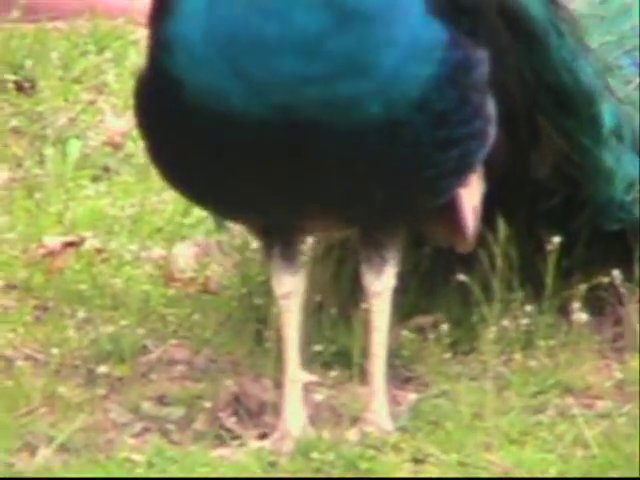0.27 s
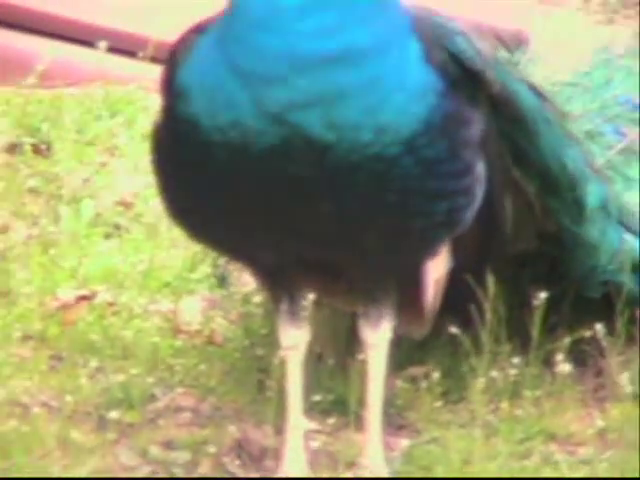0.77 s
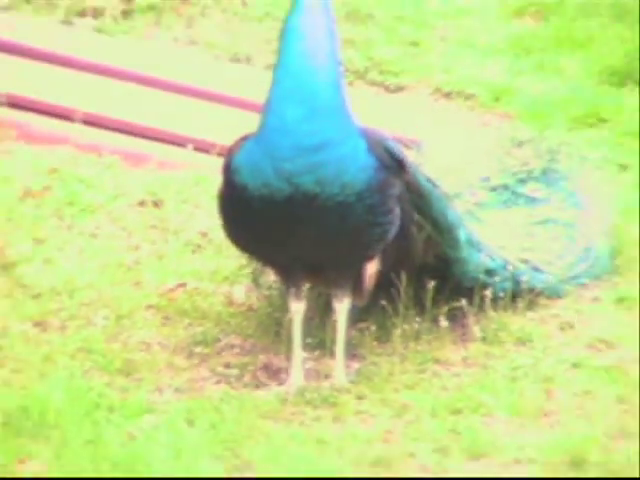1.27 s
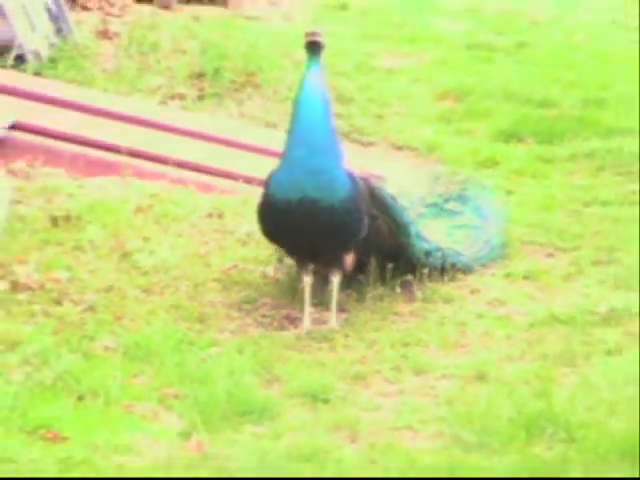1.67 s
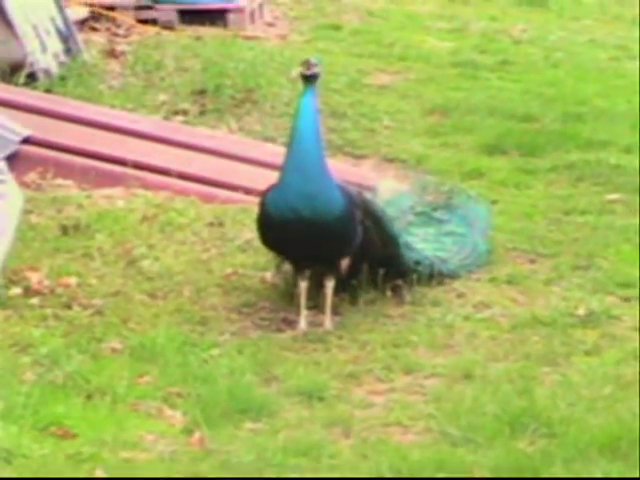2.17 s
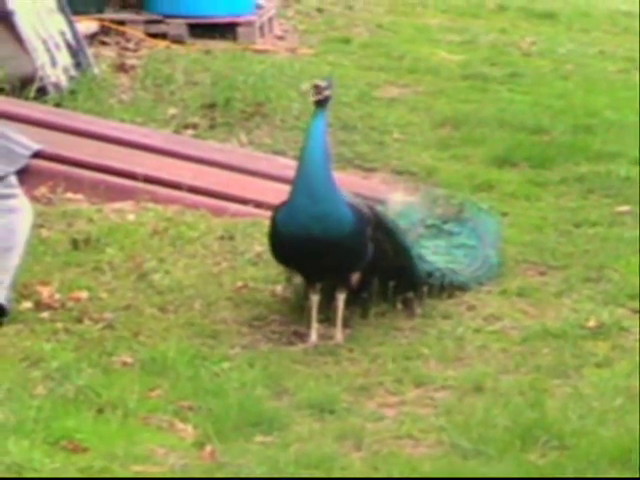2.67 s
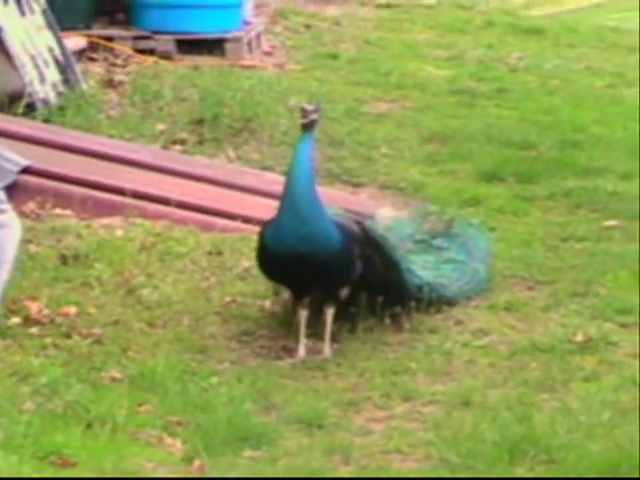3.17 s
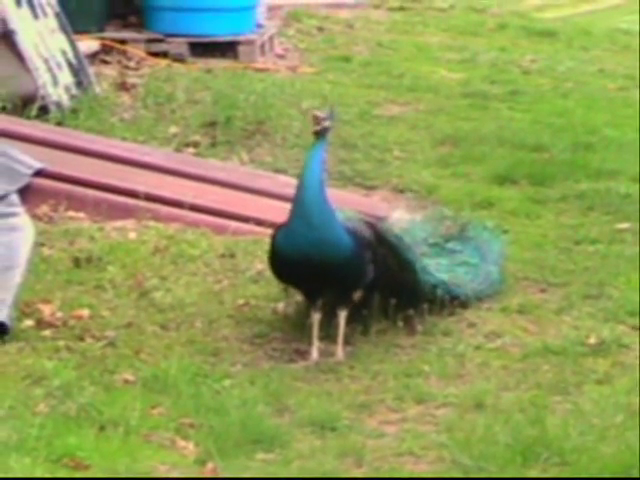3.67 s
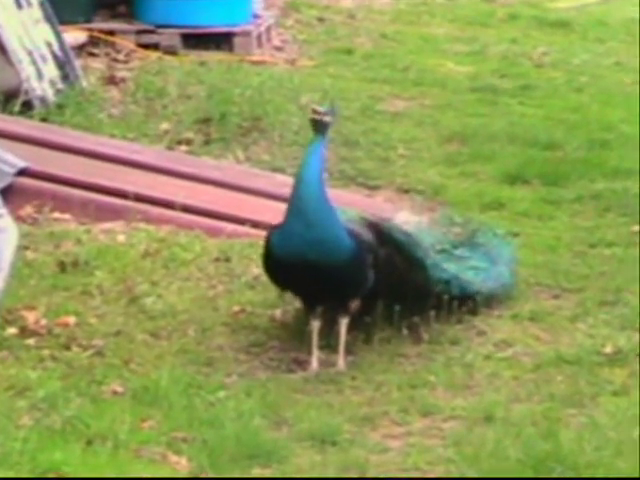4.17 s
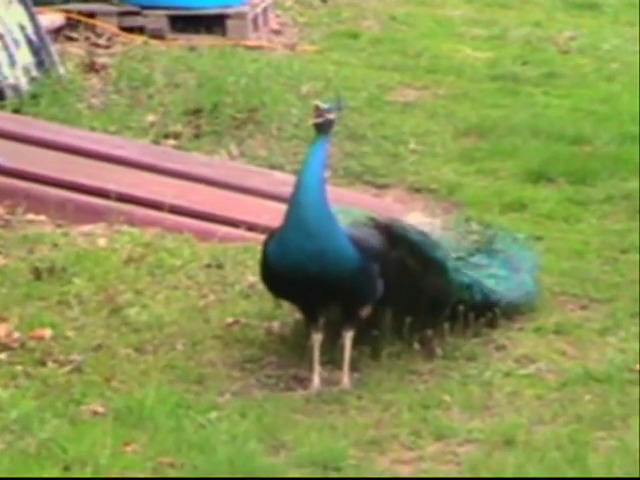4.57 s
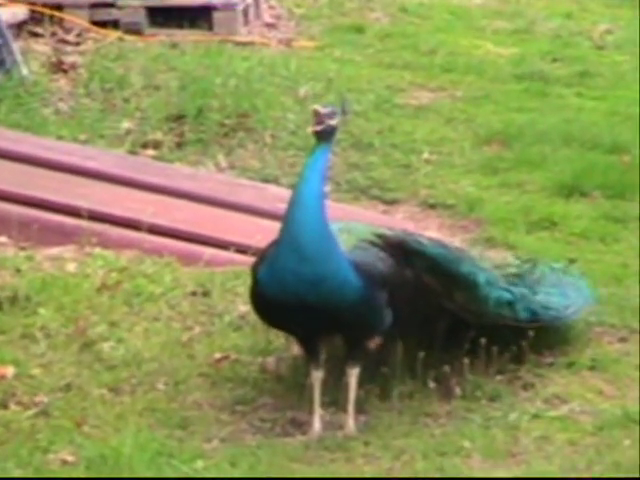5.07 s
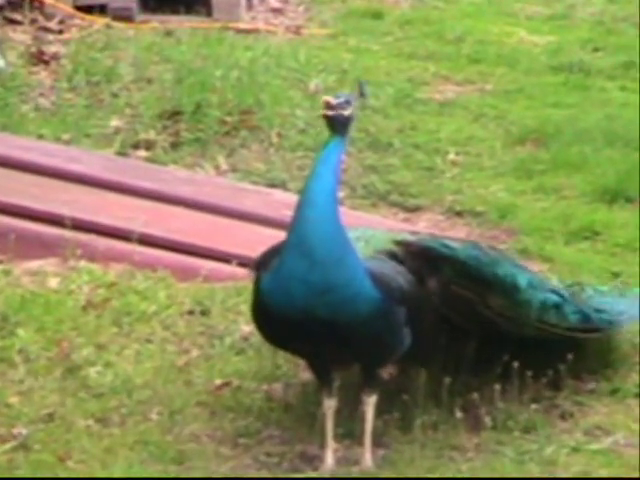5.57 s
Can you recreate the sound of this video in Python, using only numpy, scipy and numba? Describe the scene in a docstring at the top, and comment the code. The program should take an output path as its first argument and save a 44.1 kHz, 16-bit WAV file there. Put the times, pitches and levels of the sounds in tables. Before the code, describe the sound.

A peacock on a lawn gives one long throbbing, sagging wail, then six loud arched honks, echoing faintly over low outdoor air.

```python
"""A peacock on a lawn, a few metres from a camcorder: one long throbbing call, six arched honks and short clucks.
Each call stacks partials on a gliding pitch; the clucks are puffs of noise that ring the throat.
The ground colours the honks and the garden echoes every bird, over a low hum of air and a faint songbird.
The camcorder's gain control ducks the background under each call. It also holds each sample at a low rate,
which mirrors the calls into the treble as a thin fizz."""
import sys
import numpy as np
from scipy import signal
from scipy.fft import rfft, irfft, next_fast_len
from scipy.io import wavfile
from scipy.ndimage import uniform_filter1d, map_coordinates
from numba import njit

SR = 44100
rng = np.random.default_rng(int(sys.argv[2]) if len(sys.argv) > 2 else 0)


def materialize(psi):
    """Save the field psi as 16-bit PCM at rate SR to the path in sys.argv[1].

    A 1-D psi becomes a single channel; in a 2-D psi each row is a channel.
    """
    bounded = np.clip(np.atleast_2d(psi).T, -1, 1)
    quanta = np.round(bounded * 32767).astype(np.int16)
    wavfile.write(sys.argv[1], SR, quanta)


N = 255766
T = np.arange(N) / SR  # time of every sample, s


def undb(db):
    """Decibels to gain."""
    return 10 ** (np.asarray(db) / 20)


def unit(x):
    """Scale to rms 1."""
    return x / np.sqrt(np.mean(x ** 2) + 1e-20)


def columns(rows, at):
    """Read every later column of a table where the first column equals `at`, joined by straight lines."""
    first, *others = np.transpose(rows)
    return [np.interp(at, first, values) for values in others]


def spectrum_db(points, hz):
    """Read (frequency_hz, level_db) points on a log-frequency axis."""
    point_hz, point_db = np.transpose(points)
    return np.interp(np.log(np.maximum(hz, 1)), np.log(point_hz), point_db)


def noise(points, size):
    """Noise of rms 1, coloured by (frequency_hz, level_db) points."""
    n = next_fast_len(size, True)
    white = rfft(rng.standard_normal(n))
    gain = undb(spectrum_db(points, np.fft.rfftfreq(n, 1 / SR)))
    return unit(irfft(white * gain, n)[:size])


def walk(rate, size):
    """Smooth chance with a spread near 1, drawing `rate` new values a second."""
    place = np.arange(size) * rate / SR
    return map_coordinates(rng.standard_normal(size // 8), [place], order=2, mode="wrap")


def gate(t, start, end, fade):
    """1 between start and end, with straight fades."""
    return np.clip(np.minimum(t - start, end - t) / fade, 0, 1)


AIR_LEVEL_DB, AIR_DB_PER_S = -44.8, -.7  # the breeze slowly eases
GUST_DB, GUST_S = 6, .07  # a gust is dying down at the start
HUM_HZ, HUM_DB = 126, -55  # middle pitch and level of the hum
# colour of the open air: frequency_hz, level_db
AIR_COLOUR = [(25, -20), (58, -4), (120, -0.5), (200, -3.5), (320, -6), (640, -7), (1200, -11.5),
              (2000, -22.5), (3000, -28), (4800, -34), (7500, -49)]


def air(flicker_db=2.5):
    """Low outdoor rush of noise that flickers a little, with a wavering hum in it."""
    rush_db = AIR_LEVEL_DB + AIR_DB_PER_S * T + GUST_DB * np.exp(-T / GUST_S) + flicker_db * walk(9, N)
    hum_hz = HUM_HZ * (1 + 0.0495 * walk(15, N))
    hum = np.sin(2 * np.pi * np.cumsum(hum_hz) / SR) * undb(HUM_DB + 3.9 * walk(7.6, N))
    return noise(AIR_COLOUR, N) * undb(rush_db) + hum


# whistles of the far songbird: start_s, length_s, from_hz, to_hz, level_db
BIRD_WHISTLES = [(0.141, .04, 5300, 4600, -68), (0.198, 0.086, 3900, 4930, -55.5),
                 (1.62, 0.075, 5525, 4810, -55), (1.66, 0.1, 5120, 4470, -55.5),
                 (1.696, 0.032, 2200, 2405, -61), (1.722, .03, 3210, 3504, -65),
                 (1.814, 0.057, 3110, 3890, -65), (1.852, 0.037, 4510, 4150, -58)]


def songbird(waver=0.027):
    """Faint whistles from the trees: single gliding tones that waver in pitch and swell and fade."""
    out = np.zeros(N)
    wobble = 1 + waver * walk(640, N)
    for start, length, from_hz, to_hz, db in BIRD_WHISTLES:
        live = (T > start) & (T < start + length)
        progress = (T[live] - start) / length
        hz = (from_hz + (to_hz - from_hz) * progress) * wobble[live]
        out[live] += undb(db) * np.sin(np.pi * progress) * np.sin(2 * np.pi * np.cumsum(hz) / SR)
    return out


def garden(x, near_db=-14, near_t60=0.15, near_rise_s=0.0084, far_db=-28, far_t60=1.8, far_rise_s=0.041):
    """Quick scatter from things nearby, then a long faint echo from trees and houses: fading noise."""
    t = T[:int(1.5 * SR)]
    # frequency in Hz, level in dB
    near_colour = [(300, -15), (700, -5), (1300, 0), (1800, 1),
                   (2400, 2.5), (3200, 3.0), (4500, 7), (7500, -23)]
    far_colour = [(300, -5), (700, 3), (1200, -4), (1400, 2), (1700, -4),
                  (2120, 4), (2800, 1), (4000, 0), (7500, -8.0)]
    # each fades by 60 dB in its t60 seconds; the scatter waits half its rise time before it begins
    near = noise(near_colour, len(t)) * undb(-60 * t / near_t60) * np.clip(t / near_rise_s - .5, 0, 1)
    far = noise(far_colour, len(t)) * undb(-60 * t / far_t60) * np.clip(t / far_rise_s, 0, 1)
    both = undb(near_db) * unit(near) + undb(far_db) * unit(far)
    response = both / np.sqrt(len(t)) / 2  # the halving sets both 6 dB lower
    return signal.fftconvolve(x, response)[:N]


# puffs of the clucks: start_s, level_db (peak, before a shared boost of 1.2 times), ring_s
CLUCK_PUFFS = [(.253, -35.5, .005), (4.825, -13.5, 0.0025), (4.836, -10, 0.0034), (4.8415, -18, 0.0035)]
# resonances of the throat in a cluck: frequency_hz, width_hz, level_db
CLUCK_RESONANCES = [(802, 140, 12), (1090, 160, 8.5), (1650, 400, 4.5), (2200, 200, -22), (2610, 200, -25),
                    (3710, 400, -41)]


def clucks():
    """Short dying puffs of noise that ring the resonances of the throat."""
    out = np.zeros(N)
    t = np.arange(SR // 10) / SR
    # frequency in Hz, level in dB
    puff_colour = [(300, -24), (550, -12), (800, 0.0), (2000, 1.5), (3000, -5), (4500, -11), (7500, -20)]
    for start, db, ring in CLUCK_PUFFS:
        puff = noise(puff_colour, len(t)) * np.exp(-t / ring)
        sound = 0
        for hz, width_hz, mode_db in CLUCK_RESONANCES:
            b, a = signal.iirpeak(hz, hz / width_hz, fs=SR)
            sound = sound + undb(mode_db) * signal.lfilter(b, a, puff)
        i = int(start * SR)
        out[i:i + len(t)] += 1.2 * undb(db) * sound / np.abs(sound).max()
    return out


WAIL_START_S, WAIL_END_S = .303, 1.3755
WAIL_SETTLE_S, WAIL_RELEASE_S, WAIL_RELEASE_DB = 0.15, 0.14, 20
WAIL_ONSET_THIRD_DB = 26  # the third partial flares until the voice settles
# the throb starts fast and slows to a resting rate
THROB_START_HZ, THROB_REST_HZ, THROB_SLOWING_S = 57.28, 44.88, .258
# throb depth: in the held note, and what the onset and the sag add
THROB_HELD, THROB_ONSET, THROB_SAG = 0.28, 0.69, 0.65
# at either end the throbs part into pulses: how strongly, and how quickly this eases away from the end
THROB_GAP, THROB_GAP_S = 1.1, 0.037
# the long call overshoots, holds, then sags: time_s, pitch_hz
WAIL_GLIDE = [(.309, 682.4), (.37, 734.7), (.47, 700), (.55, 693), (.78, 693), (.97, 669), (1.26, 631.2),
              (1.37, 622.5)]
# one row each for the first partial, the second partial and the overtones: held_level_db, attack_s,
# attack_rise_db, until_settled_db (change), sagged_db (change), sag_lateness (power; 1 follows the pitch)
WAIL_PARTS = [(-12.5, 0.038, 16.5, -5, -12.5, 1.1), (-.3, 0.059, 46.5, 0, -3.5, 1.2),
              (-21.3, 0.053, 36, -10, -9.5, 3)]
# overtones of the long call: partial_number, high_pitch_db, sagged_pitch_db
WAIL_UPPER_PARTIALS = [(3, -15.5, -5), (4, 0, 0.5), (5, -8, -13), (6, -5.5, -14.5), (7, -16.5, -17),
                       (8, -19, -14), (9, -17, -18), (10, -16, -17)]


def wail(jitter=0.002, throb_jitter=0.014, shimmer=.04, first_throb=0.34, upper_throb=0.45, rasp_db=-51,
         sag_from_hz=690, sag_span_hz=41, upper_swing=0.68, first_throb_s=.0074):
    """The long call: a near-pure second partial that beats against a slow flutter of the syrinx."""
    live = (T > WAIL_START_S) & (T < WAIL_END_S)
    t = T[live]
    age, left = t - WAIL_START_S, WAIL_END_S - t
    hz, = columns(WAIL_GLIDE, t)
    # the voice throbs deeply until it settles, and again as the pitch sags
    onset = 1 / (1 + (age / WAIL_SETTLE_S) ** 6)
    sag = np.clip((sag_from_hz - hz) / sag_span_hz, 0, 1)
    rate = THROB_REST_HZ + (THROB_START_HZ - THROB_REST_HZ) * np.exp(-age / THROB_SLOWING_S)
    depth = THROB_HELD + THROB_ONSET * onset + THROB_SAG * sag
    gap = THROB_GAP * np.exp(-np.minimum(age, left) / THROB_GAP_S)
    release_db = WAIL_RELEASE_DB * np.clip(1 - left / WAIL_RELEASE_S, 0, 1) ** 2

    def part_db(held_db, attack, rise_db, onset_db, sag_db, lateness):
        """Level over time of one row: it rises, settles, changes with the sag and is released."""
        rising_db = held_db - rise_db * np.exp(-(age / attack) ** 2)
        return rising_db + onset_db * onset + sag_db * sag ** lateness - release_db

    first_db, second_db, upper_db = (part_db(*row) for row in WAIL_PARTS)
    # the deeper the throb, the less steady the pitch
    unsteady = 1 + (jitter + throb_jitter * depth ** 2) * walk(250, len(t))
    phase = 2 * np.pi * np.cumsum(hz * unsteady) / SR
    flutter = 2 * np.pi * (np.cumsum(rate) / SR - THROB_START_HZ * first_throb_s)

    def partial(k, beat, swing=0):
        """One partial with a side tone a flutter rate below it; its phase may swing with each throb."""
        throb = (1 + beat * np.exp(-1j * flutter)) / np.sqrt(1 + beat ** 2)
        tone = np.exp(1j * (k * phase + swing * np.cos(flutter)))
        return np.sqrt(2) * np.real(throb * tone) * (1 + shimmer * (1 + depth) * walk(100.2, len(t)))

    voice = undb(first_db) * partial(1, first_throb * depth) + undb(second_db) * partial(2, depth)
    for k, high_db, low_db in WAIL_UPPER_PARTIALS:
        db = upper_db + high_db + (low_db - high_db) * sag + WAIL_ONSET_THIRD_DB * onset * (k == 3)
        voice += undb(db) * partial(k, upper_throb * depth, upper_swing * (0.38 + depth))
    # breathy noise follows the second partial and throbs with it
    rasp_colour = [(300, -21), (700, 10), (1400, 7), (1800, -23), (2700, -15), (3800, -16), (7000, -31)]
    rasp = noise(rasp_colour, len(t))
    voice += undb(second_db + rasp_db) * rasp * (1 + depth * np.cos(flutter))
    # at low pressure the throbs fall apart into separate pulses
    pulses = np.exp(gap * np.cos(flutter)) / np.sqrt(np.i0(2 * gap))
    out = np.zeros(N)
    out[live] = voice * pulses * gate(t, WAIL_START_S, WAIL_END_S, 0.0046)
    return out


HONK_ATTACK_S, HONK_RELEASE_S = 0.04, 0.059
HONK_PUSH_S = 0.12  # how quickly the opening push dies away
STRAIN_FROM_HZ, STRAIN_SPAN_HZ = 663.8, 44  # pitch where strain begins, and the climb to a strain of 1
# brightness (dB per octave): added under strain, added as the honk dies away
STRAIN_BRIGHT_DB, END_BRIGHT_DB = .7, 4.5
# lift of the third partial (dB) with slack membranes and under strain
SLACK_THIRD_DB, STRAIN_THIRD_DB = 3, -1.5
# each partial flickers on its own (share of its size): hardly at the top, with more added on the flanks
TOP_SHIMMER, FLANK_SHIMMER = .014, .11
# colour of throat and beak: frequency_hz, level_db
THROAT_COLOUR = [(550, -6.5), (700, -7.8), (1100, 4.5), (1300, 1.5), (1750, -1), (2150, 2.3), (2450, 2),
                 (2700, .7), (3200, -7.5), (3650, -16), (4200, -16), (4700, -23.5), (5700, -32),
                 (7500, -36)]
# what a strain of 1 adds to each partial near the top of the pitch: partial_number, change_db
STRAIN_CHANGE = [(1, 3.5), (2, -13.5), (3, 6.5), (4, -12), (5, 3), (6, 3.5), (7, -7), (8, 7), (9, 2)]
# pitch at even steps through a honk: drop_share (part of its drop, counted down from the top pitch)
ARCH_SHAPE = [1.0, .68, .41, .14, 0.034, 0.015, 0.033, .16, .36, .64, 1.16]
# the same for the first honk, which climbs in two steps: drop_share
STEPPED_ARCH_SHAPE = [1.02, .84, .59, .41, .36, .29, .085, 0.017, .19, .58, 1.1]
# one row per honk: start_s, length_s, top_pitch_hz, drop_hz, lean (power; under 1 peaks early), level_db,
# opening_push_db, strain_change_db, brightness_db_per_octave, ground_lag_ms, ground_bounce (0-1),
# second_lag_ms, second_bounce (0-1)
HONK_ROWS = [ (1.878, .401, 668.7, 129.3, 0.98, -5, -4, -13, 1, 2.105, 0.23, 1.35, 0.26),
             (2.483, 0.38, 694.1, 146.2, 0.94, -8, 4.5, -5.5, 1, 2.031, 0.54, 3.68, 0.23),
             (3.029, 0.39, 698.3, 131.8, 0.92, -7.5, 1.5, -2.5, 0.2, 2.07, 0.39, 3.71, 0.24),
             (3.609, 0.42, 707.4, 131.1, 0.91, -7, 1, -2, 0.36, 1.965, 0.42, 3.7, 0.2),
             (4.237, .465, 708.7, 133.4, .89, -7, 0.5, -1.5, 0, 1.975, 0.55, 3.68, 0.39),
             (4.971, .524, 709.2, 134.3, 0.91, -7, 0.5, -2.5, 0.6, 1.966, .49, 3.39, 0.22), ]


def honk(row, arch, jitter=0.00035, slack_jitter=0.014, slack_shimmer=0.27, rasp_db=-61, slack_rasp_db=40,
         rise_s=0.048, fall_s=0.053, dying_s=0.027, count=13):
    """One arched honk of stacked partials: clean and strained at the top, rough where the pitch is low."""
    (start, length, top_hz, drop_hz, lean, level_db, push_db, strain_db, tilt_db,
     ground_ms, ground, second_ms, second) = row
    live = (T > start) & (T < start + length)
    t = T[live]
    age, left = t - start, start + length - t
    step = (len(arch) - 1) * (age / length) ** lean
    hz = top_hz - drop_hz * map_coordinates(np.array(arch, float), [step], order=3, mode="nearest")
    strain = np.clip((hz - STRAIN_FROM_HZ) / STRAIN_SPAN_HZ, 0, 1.2)
    # the membranes are slack as the call starts and ends: cycles come unevenly in length and size
    slack = np.maximum(np.exp(-age / rise_s), np.exp(-left / fall_s)) * np.clip(1 - strain, 0, 1)
    envelope = np.clip(np.minimum(age / HONK_ATTACK_S, left / HONK_RELEASE_S), 0, 1)
    db = level_db + push_db * np.exp(-(age / HONK_PUSH_S) ** 2) + strain_db * strain
    bright_db = tilt_db + STRAIN_BRIGHT_DB * strain + END_BRIGHT_DB * np.exp(-left / dying_s)
    third_db = SLACK_THIRD_DB * slack + STRAIN_THIRD_DB * strain
    unsteady = 1 + (jitter + slack_jitter * slack) * walk(500, len(t))
    phase = 2 * np.pi * np.cumsum(hz * unsteady) / SR
    uneven = 1 + slack_shimmer * slack * walk(350, len(t))
    shimmer = TOP_SHIMMER + FLANK_SHIMMER * np.clip((top_hz - hz) / drop_hz * 2, 0, 1)
    voice, power = 0, 0
    for k in range(1, count):
        partial_hz = k * hz
        colour_db = spectrum_db(THROAT_COLOUR, partial_hz) + strain * columns(STRAIN_CHANGE, k)[0]
        colour_db = colour_db + bright_db * np.log2(k / 2) + third_db * (k == 3)
        # the bounce off the grass comes back inverted; partials swell and dip as they glide through the combs
        turn = -2j * np.pi * partial_hz / 1000  # phase turn per ms of lag
        bounces = 1 - ground * np.exp(turn * ground_ms) + second * np.exp(turn * second_ms)
        gain = undb(colour_db) * bounces
        tone = np.exp(1j * (k * phase + 0.603 * k * k))  # partials start at spread-out phases
        voice += np.real(gain * tone) * (1 + shimmer * walk(68.5, len(t)))
        power += np.abs(gain) ** 2 / 2
    # even out the slow changes in power, so that the level is set by db alone
    voice *= uneven / np.sqrt(uniform_filter1d(power, size=3000))
    # rasp pulses once a cycle and grows where the membranes are slack
    rasp_gain = undb(rasp_db + slack_rasp_db * np.sqrt(slack))
    rasp = noise(THROAT_COLOUR, len(t)) * (1 + np.cos(phase)) * rasp_gain
    rasp = signal.sosfilt(signal.butter(2, 600, "high", fs=SR, output="sos"), rasp)
    out = np.zeros(N)
    out[live] = (voice + rasp) * undb(db) * envelope
    return out


@njit
def follow(x, attack, release):
    """Envelope that rises quickly and falls slowly; attack and release are the shares moved per sample."""
    out, e = np.empty(len(x)), 0.
    for i in range(len(x)):
        e += (abs(x[i]) - e) * (attack if abs(x[i]) > e else release)
        out[i] = e
    return out


def scene():
    """All the birds, their echo and the air."""
    honks = honk(HONK_ROWS[0], STEPPED_ARCH_SHAPE) + sum(honk(row, ARCH_SHAPE) for row in HONK_ROWS[1:])
    birds = wail() + honks + clucks() + songbird()
    return (birds + garden(birds) + air())[None]


# gain control: threshold, share of the excess dB taken off, attack and release
AGC_THRESHOLD_DB, AGC_SHARE, AGC_ATTACK_S, AGC_RELEASE_S = -17, .6, 0.011, 0.23
CAMERA_RATE = 16004  # samples a second
TOP_HZ = 15700  # nothing much is left above this


def record(dry):
    """The camcorder turns loud calls down, then holds low-rate samples: the steps mirror partials upwards."""
    loudness = follow(dry[0], 1 / (AGC_ATTACK_S * SR), 1 / (AGC_RELEASE_S * SR))
    gain = np.maximum(loudness / undb(AGC_THRESHOLD_DB), 1) ** -AGC_SHARE
    slow = signal.resample_poly(dry * gain, CAMERA_RATE, SR, axis=1)
    held = slow[:, np.arange(N) * CAMERA_RATE // SR]
    return signal.sosfilt(signal.ellip(10, .2, 80, TOP_HZ, fs=SR, output="sos"), held)


dry = scene()
out = record(dry)
materialize(out)
```